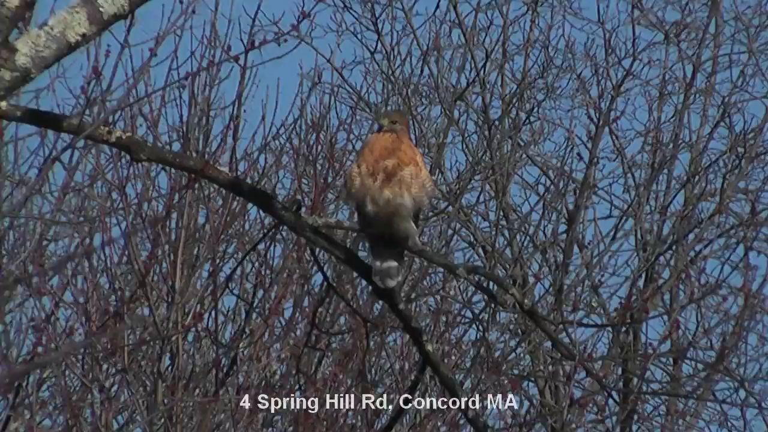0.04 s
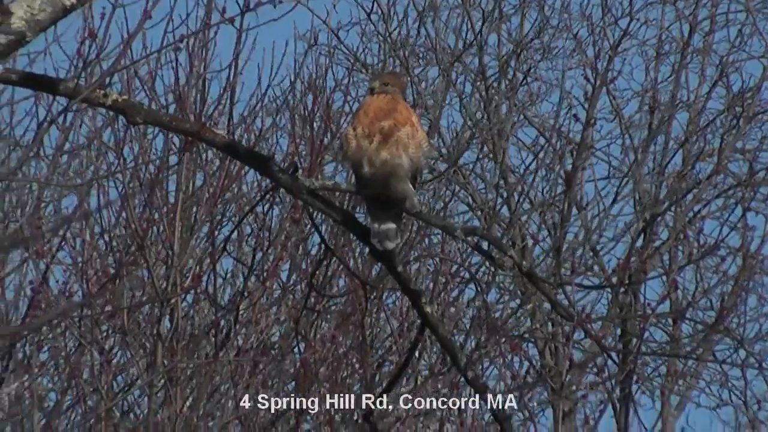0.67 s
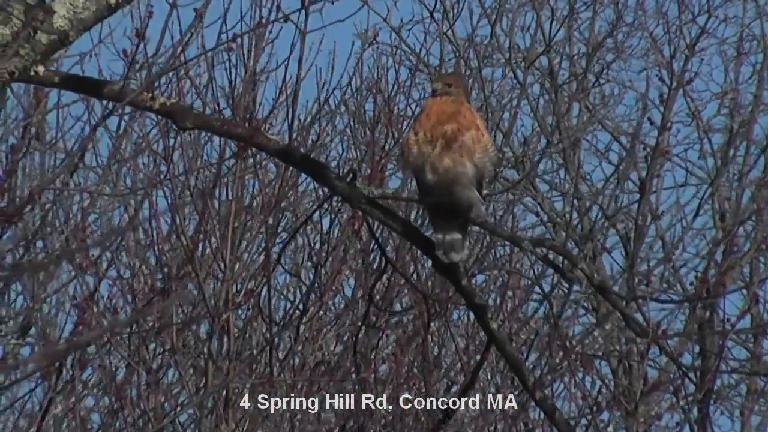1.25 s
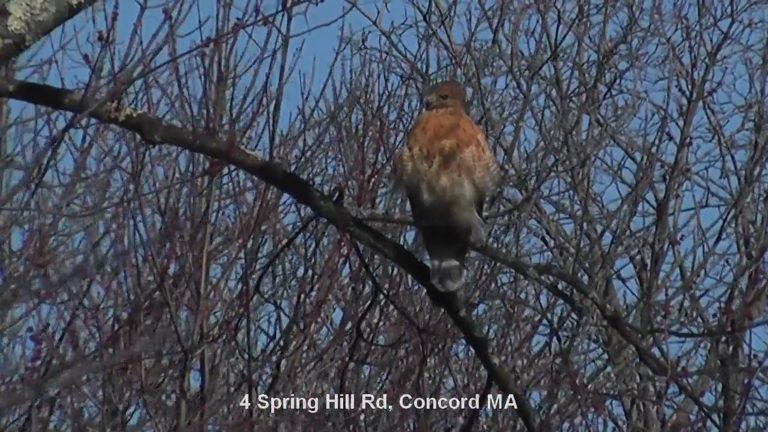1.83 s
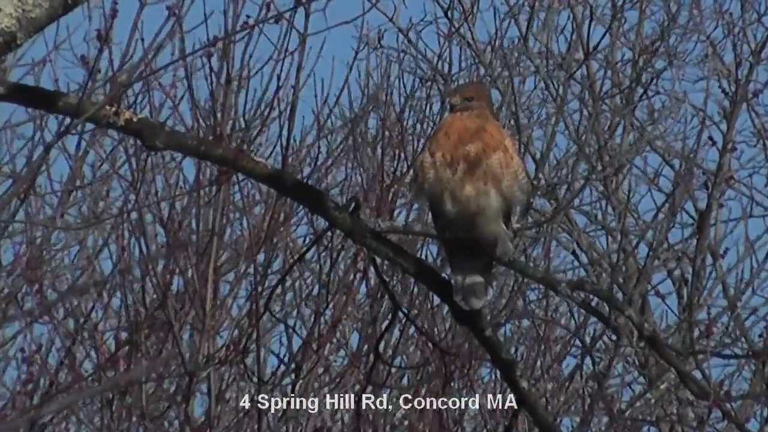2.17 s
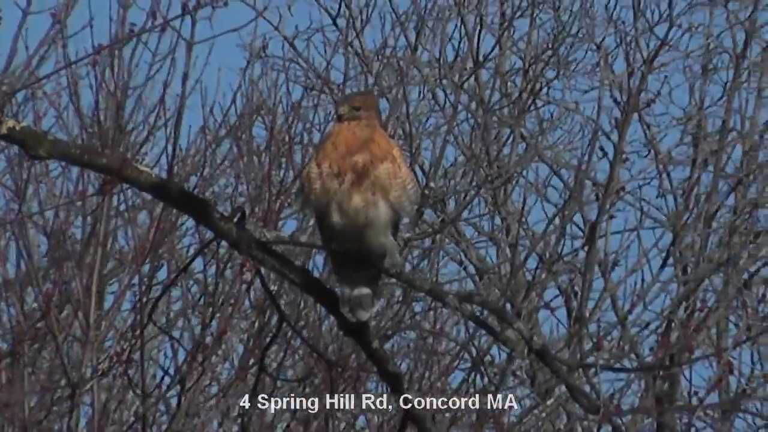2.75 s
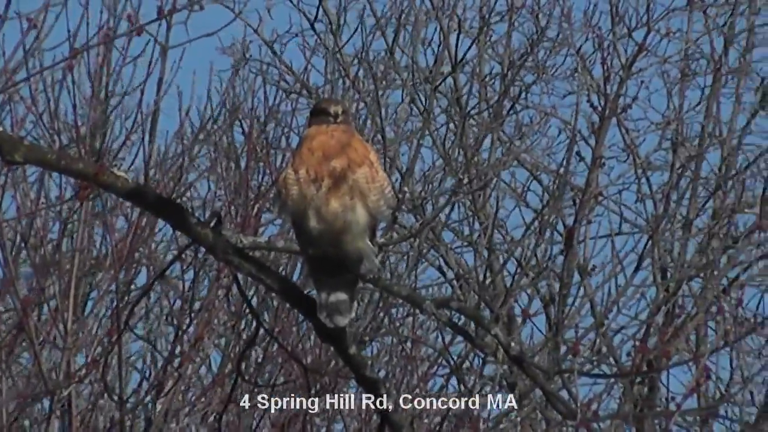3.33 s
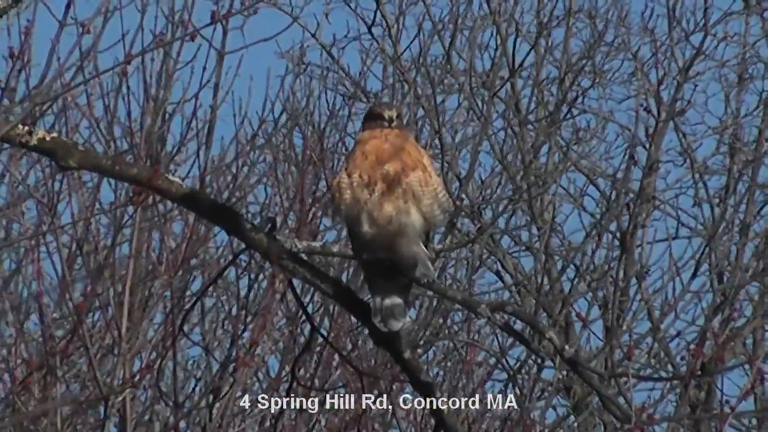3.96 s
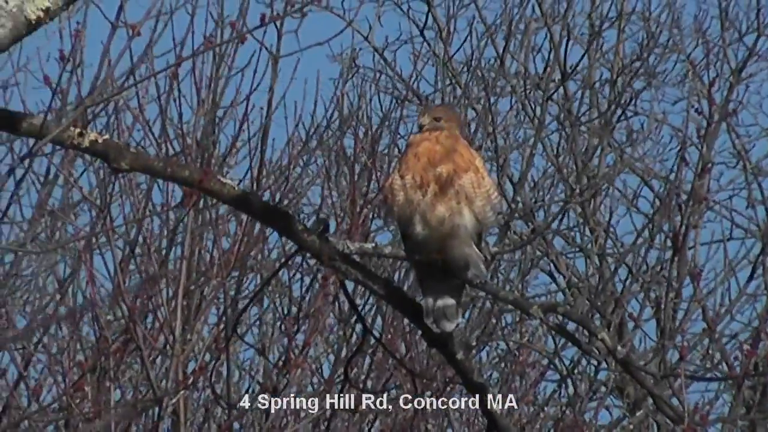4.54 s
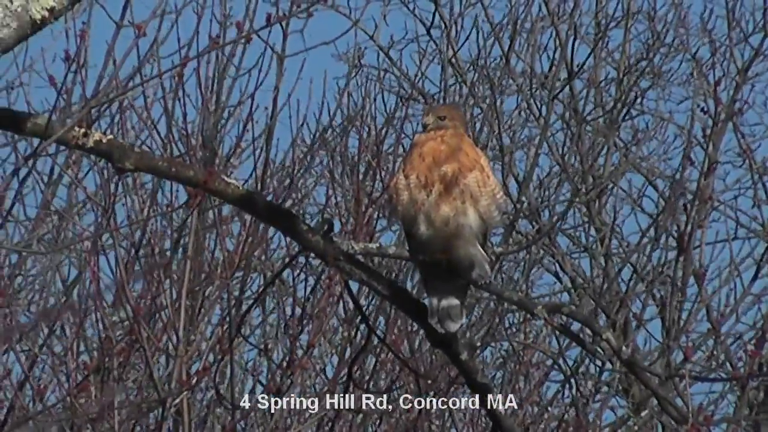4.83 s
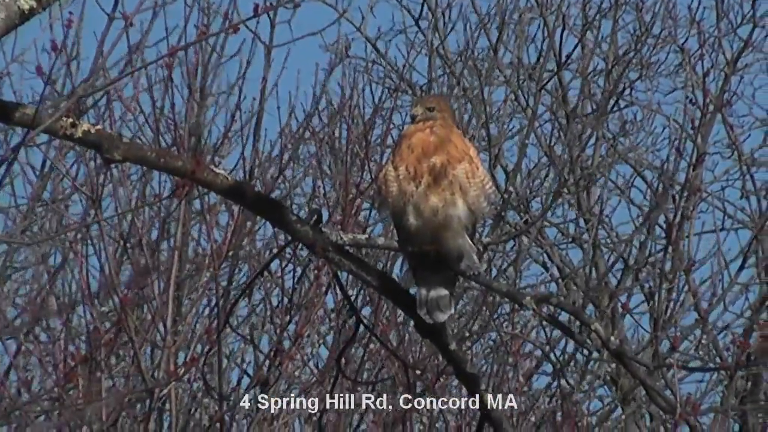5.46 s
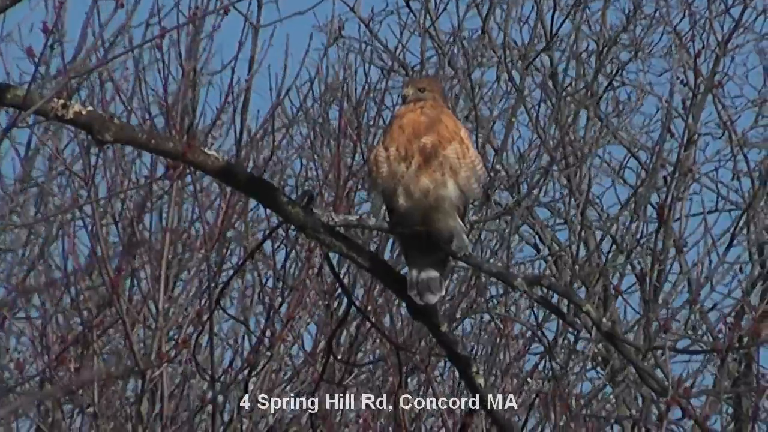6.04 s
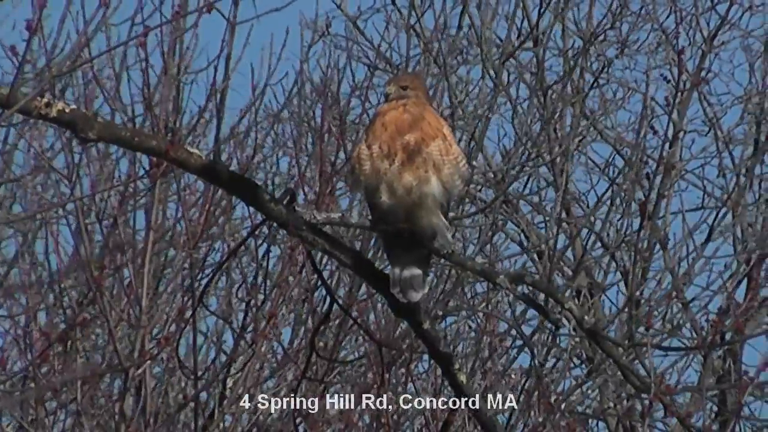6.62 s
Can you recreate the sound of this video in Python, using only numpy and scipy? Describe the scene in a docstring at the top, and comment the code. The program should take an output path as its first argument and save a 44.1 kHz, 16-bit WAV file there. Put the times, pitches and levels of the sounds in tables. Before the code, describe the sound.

Many small birds chirp and chatter close by and farther off, over a faint hum of distant traffic.

```python
"""Small birds in bare trees

A flock chatters around the microphone on a still day, with traffic humming in the distance.
Each call is one gliding whistle: a falling slur, a rising flick, an up-and-down chip, a bowed note,
a level peep, a buzz or a rasp. Trunks and twigs scatter it into a short blur, and the birds
farther off merge into a twitter. The sound starts a tenth of a second in."""
import sys
import numpy as np
from scipy import signal
from scipy.fft import rfft, irfft
from scipy.io import wavfile
from scipy.ndimage import uniform_filter1d

SR = 44100
rng = np.random.default_rng(int(sys.argv[2]) if len(sys.argv) > 2 else 0)


def dump(signal):
    """Clip the signal to [-1, 1] and save it as 16-bit WAV at the path in sys.argv[1]."""
    limited = np.clip(np.atleast_2d(signal).T, -1, 1)
    pcm = np.round(limited * 32767).astype(np.int16)
    wavfile.write(sys.argv[1], SR, pcm)


N = 295029
CUTOFF_HZ = 15600   # top of the recorder's range


def from_db(db):
    """Decibels as a gain."""
    return 10 ** (np.asarray(db) / 20)


def at_hz(points, hz):
    """Read a table on a log-frequency axis."""
    return np.interp(np.log(hz), np.log(np.array(points)[:, 0]), np.array(points)[:, 1])


def gain_curve(levels):
    """Levels over time as a gain for every sample."""
    return from_db(np.interp(np.arange(N) / SR, *np.transpose(levels)))


def drift(per_s, size):
    """A random wander of spread about 1, with per_s new values a second."""
    steps = np.arange(size) * per_s / SR
    count = int(steps[-1]) + 2
    return np.interp(steps, np.arange(count), rng.standard_normal(count))


def add(track, time, sound, pan_db):
    """Mix a sound into a stereo track, louder on the left by pan_db."""
    at = int(np.clip(time * SR, 0, N - 1))
    track[:, at:at + len(sound)] += from_db([[pan_db / 2], [-pan_db / 2]]) * sound[:N - at]


def stereo(mid, side, correlation):
    """Two unrelated signals make a left and right pair of the given correlation."""
    difference = np.sqrt((1 - correlation) / 2) * side
    return np.sqrt((1 + correlation) / 2) * mid + np.array([difference, -difference])


# Distant roads and still air at the microphone: (frequency [Hz], relative level [dB])
TRAFFIC_SPECTRUM = [(20, -26), (45, -11.5), (70, -10), (120, -1.5), (190, 0.5), (250, -2), (350, -2),
                    (430, -5.5), (800, -10), (2000, -14), (4000, -18), (7500, -34), (11000, -37),
                    (13000, -35.5), (14700, -46), (15500, -47)]
# How alike the two channels are: (frequency [Hz], correlation [-1 to 1])
TRAFFIC_CORRELATION = [(25, -0.5), (45, -0.61), (75, 0.9), (150, 0.85), (350, 0.79), (700, 0.48),
                       (1100, 0.6), (1900, 0.59), (3300, 0.46), (5500, 1), (9000, 1), (11000, 0.28),
                       (13000, -0.11)]
# The side the roar leans to: (frequency [Hz], left minus right [dB])
TRAFFIC_PAN = [(25, 0), (60, 3.5), (110, 0.5), (250, .5), (700, 0), (1300, -2), (2400, -0.5), (8000, -2),
               (15000, 2)]


def traffic(level_db=-43.5, swell_db=0.76):
    """Far roads give a smooth low roar that thins into hiss."""
    hz = np.maximum(np.arange(N // 2 + 1) * SR / N, 1)
    mid, side = rfft(rng.standard_normal((2, N)))
    colour = from_db(at_hz(TRAFFIC_SPECTRUM, hz) + at_hz(TRAFFIC_PAN, hz) * np.array([[.5], [-.5]]))
    roar = irfft(stereo(mid, side, at_hz(TRAFFIC_CORRELATION, hz)) * colour, N)
    roar /= np.sqrt(np.mean(roar ** 2))
    return roar * from_db(level_db - swell_db * drift(3.06, N))


def trees(sound, decay_s, gap_s, dull_hz, correlation=0.98, reflections=260):
    """Trunks and twigs return many weak reflections, dull at the top and 60 dB down after decay_s."""
    paths = np.zeros((2, SR))
    for path in paths:
        delays = ((gap_s + .7 * rng.random(reflections) ** 1.5) * SR).astype(int)
        path[delays] = rng.standard_normal(reflections) * from_db(-60 * delays / SR / decay_s)
        path /= np.sqrt(np.sum(path ** 2))
    dulled = signal.sosfilt(signal.butter(2, dull_hz, fs=SR, output="sos"), sound)
    return signal.fftconvolve(dulled, stereo(*paths, correlation), axes=1)[:, :N]


def progress(length):
    """A ramp from 0 to 1 over a note."""
    return np.linspace(0, 1, int(length * SR))


def glide(length, start, middle, end):
    """Syrinx tension bends the pitch along one arc through three points."""
    return np.polyval(np.polyfit([0, .5, 1], [start, middle, end], 2), progress(length))


# The octave comes through best from the higher notes: (note pitch [Hz], relative octave level [dB])
OCTAVE_LEVELS = [(3500, -33), (4700, -27), (5400, -16), (6200, -25), (7500, -28)]


def whistle(hz, shake=0.012, shake_per_s=700, flutter_db=2.0, attack=0.099, release=0.14, octave_db=0.0):
    """An unsteady tone with two faint overtones; attack and release are shares of its length."""
    size = len(hz)
    along = np.linspace(0, 1, size)
    unsteady_hz = hz * (1 + shake * drift(shake_per_s, size) + 0.0058 * drift(70, size))
    phase = 2 * np.pi * np.cumsum(unsteady_hz) / SR
    swell = np.sin(np.pi / 2 * np.clip(np.minimum(along / attack, (1 - along) / release), 0, 1))
    flutter = from_db(flutter_db * drift(300, size))
    octave = from_db(at_hz(OCTAVE_LEVELS, hz) + octave_db) * (2 * hz < CUTOFF_HZ) * np.sin(2 * phase)
    third_harmonic = from_db(-32) * (hz > 4400) * (3 * hz < CUTOFF_HZ) * np.sin(3 * phase)
    return np.sqrt(2) * swell * flutter * (np.sin(phase) + octave + third_harmonic)


def chorus(colour, count, low_hz, high_hz, longest_s, fall, direct_db, spread_db):
    """Random chirps, mostly falling, blur together through much wood; the level is held near 1."""
    calls = np.zeros((2, N))
    choices, quirks = rng.random((count, 3)), rng.standard_normal((count, 4))
    for (when, span, pitch), (slope, arch, strength, side) in zip(choices, quirks):
        centre_hz = low_hz * (high_hz / low_hz) ** pitch
        tilt = fall + 0.1107 * slope
        hz = glide(longest_s * (.2 + .8 * span), *centre_hz * np.exp([tilt, .08 * arch, -tilt]))
        hz = np.clip(hz, 1500, .4 * SR)
        gain = from_db(spread_db * strength + at_hz(colour, hz))
        add(calls, when * N / SR, gain * whistle(hz, shake=.014, octave_db=-1.0), pan_db=0.8 - side)
    heard = from_db(direct_db) * calls + trees(calls, decay_s=0.62, gap_s=.004, dull_hz=13900)
    running_power = uniform_filter1d(np.mean(heard ** 2, axis=0), int(.12 * SR))
    return heard / np.sqrt(running_power + 1e-6)


# The far flock and its thin high twitter at the microphone: (time [s], level [dB])
FLOCK_LEVELS = [(.1, -42.5), (.32, -50), (.5, -44.5), (.87, -50.5), (1.15, -47), (1.56, -49), (1.8, -53),
                (2.1, -54), (2.4, -50), (2.93, -48), (3.31, -45.5), (3.72, -49.5), (3.95, -54.5),
                (4.23, -51), (4.75, -46), (5.1, -46.5), (5.48, -52), (5.72, -44.5), (5.98, -50.5),
                (6.45, -47.5), (6.58, -51.5), (6.69, -42)]
TWITTER_LEVELS = [(.1, -66.5), (.55, -58), (.77, -70), (.87, -59.5), (1.6, -58), (1.78, -77), (2.03, -67),
                  (2.7, -64.5), (3.0, -62.5), (3.9, -64.5), (4.45, -61.5), (4.6, -66), (4.75, -63),
                  (5.27, -60.5), (5.45, -60), (5.77, -55.5), (5.98, -71), (6.2, -55), (6.45, -60),
                  (6.65, -56.5)]
# How strongly each pitch comes through in the two: (pitch [Hz], relative level [dB])
FLOCK_PITCHES = [(1900, -30), (2250, -1.5), (2700, -1.5), (3000, 1), (3600, 2.5), (4500, -0.5), (5600, -6),
                 (6500, -10), (7500, -7)]
TWITTER_PITCHES = [(5000, 12), (6500, 8), (8000, -2.5), (11000, -5), (13000, -6), (15000, -10)]


def far_flock():
    """Well back among the trees, a wash of lingering chirps with tiny high notes above it."""
    chirps = chorus(FLOCK_PITCHES, count=640, low_hz=2500, high_hz=6043, longest_s=.06,
                    fall=0.0489, direct_db=-2.0, spread_db=2.0)
    twitter = chorus(TWITTER_PITCHES, count=700, low_hz=5964, high_hz=13330, longest_s=.025,
                     fall=0.029, direct_db=-5.0, spread_db=-0.5)
    return gain_curve(FLOCK_LEVELS) * chirps + gain_curve(TWITTER_LEVELS) * twitter


# Distant birds, dead centre: (time [s], length [s], start [Hz], end [Hz], level before the wood [dB])
FAR_CALLS = [(.543, 0.067, 2360, 2170, -53), (.65, 0.067, 2250, 2170, -53.5), (.735, .07, 2360, 2110, -55),
             (1.22, .08, 2300, 2210, -58), (1.83, 0.047, 2300, 2150, -59), (1.915, 0.089, 2170, 2280, -55),
             (2.36, .05, 2270, 2180, -58), (2.72, 0.089, 2320, 2020, -54), (2.76, .12, 2860, 2700, -52),
             (2.88, 0.064, 2130, 2230, -58), (3.05, 0.096, 2230, 2320, -51.5), (3.68, .1, 2730, 2670, -51),
             (3.72, 0.13, 1800, 1750, -56.5), (4.7, .06, 2300, 2120, -53.5), (5.03, 0.053, 2380, 2270, -56),
             (5.27, 0.06, 2350, 2200, -56), (5.45, .07, 1925, 1860, -60), (5.68, 0.062, 2500, 2035, -53),
             (5.91, 0.057, 2190, 2320, -53)]


def far_whistles(direct_db=-2.0, echo_db=-3.0):
    """Low, slow whistles from deep in the wood, half drowned in their own echo."""
    calls = np.zeros((2, N))
    for time, length, start_hz, end_hz, level_db in FAR_CALLS:
        hz = glide(length, start_hz, (start_hz + end_hz) / 2, end_hz)
        add(calls, time, from_db(level_db) * whistle(hz, attack=0.14, release=0.21), pan_db=0)
    echo = trees(calls, decay_s=.6, gap_s=.006, dull_hz=6000, correlation=0.89)
    return from_db(direct_db) * calls + from_db(echo_db) * echo


# Harsh calls in front of the microphone: (time [s], length [s], nominal pitch [Hz], level [dB])
RASP_CALLS = [(0.55, 0.068, 6040, -58), (1.026, 0.047, 5770, -59), (1.583, .069, 5760, -54.5),
              (1.998, 0.025, 5700, -53.5), (3.364, 0.058, 5700, -55), (4.388, .065, 5950, -50.5),
              (4.653, 0.13, 6050, -55), (4.976, 0.061, 10300, -58), (5.023, .069, 8300, -58.5),
              (5.025, .05, 12400, -64), (5.085, .035, 12000, -67), (5.03, 0.14, 6270, -62),
              (5.35, .06, 7220, -55.5), (5.407, 0.12, 7060, -58), (5.733, 0.048, 5550, -49.5),
              (6.15, 0.075, 6400, -53.5), (6.214, 0.053, 8850, -69), (6.28, 0.11, 6280, -60),
              (6.612, 0.07, 5350, -56)]


def squabbles(fall=0.051, echo_db=-1.5):
    """A hard-driven syrinx shakes so fast that the whistle breaks into a rasp."""
    calls = np.zeros((2, N))
    for time, length, pitch_hz, level_db in RASP_CALLS:
        hz = pitch_hz * glide(length, 1 + fall, 0.96, 1 - fall)
        rasp = whistle(hz, shake=0.086, shake_per_s=850, flutter_db=0.0, attack=0.19, octave_db=3.5)
        add(calls, time, from_db(level_db) * rasp, pan_db=0.5)
    return calls + from_db(echo_db) * trees(calls, decay_s=0.16, gap_s=0.0016, dull_hz=13000)


def call(time, hz, level_db, pan_db, echo_db, echo_follows=0.77, octave_db=0.0):
    """One call: its time, its pan, the whistle reaching the microphone and that sent into the wood."""
    tone = whistle(hz, octave_db=octave_db)
    typical_db = -49
    # The echo varies less than the direct sound between near calls and faint, far ones.
    wood_db = typical_db + echo_db + echo_follows * (level_db - typical_db)
    return time, pan_db, from_db(level_db) * tone, from_db(wood_db) * tone


# Nearly level notes from straight ahead: (time [s], length [s], nominal pitch [Hz], level [dB])
PEEP_CALLS = [(1.017, .02, 7750, -56), (1.204, 0.051, 5980, -52.5), (1.282, 0.033, 5220, -50.5),
              (1.781, 0.025, 6140, -59), (2.535, .035, 5900, -58.5), (2.859, 0.033, 9850, -64),
              (3.005, 0.026, 3650, -50), (3.53, .04, 9100, -68), (3.727, 0.067, 5370, -54.5),
              (3.74, 0.05, 3550, -51), (3.888, 0.021, 3450, -47), (3.895, .035, 5350, -58),
              (3.969, 0.046, 5480, -50.5), (4.219, 0.037, 3410, -48.5), (4.456, 0.042, 4830, -50),
              (4.495, .02, 6180, -52), (4.927, 0.029, 3690, -45), (5.245, 0.023, 5020, -48),
              (5.425, 0.037, 9700, -61), (5.812, 0.029, 5900, -59), (5.898, 0.073, 9430, -63),
              (6.272, 0.021, 3050, -54), (6.557, 0.032, 3080, -48)]


def peeps():
    """Held notes that lift a little and sag at the end."""
    for time, length, pitch_hz, level_db in PEEP_CALLS:
        hz = pitch_hz * glide(length, 0.9685, 0.99, 0.937)
        yield call(time, hz, level_db, pan_db=0, echo_db=-5.5, echo_follows=0.94)


# Bowed notes from the nearby trees:
# (time [s], length [s], start [Hz], middle [Hz], end [Hz], level [dB], left minus right [dB])
ARC_CALLS = [(.847, 0.023, 5530, 7000, 7640, -48, -0.5), (1.176, 0.029, 5260, 5840, 5630, -47, 0),
             (2.016, 0.026, 3990, 4450, 3700, -42, 1), (2.3, 0.08, 3220, 3540, 3250, -49, 2),
             (2.852, .048, 4500, 4950, 4700, -62, -2), (2.938, 0.035, 4100, 4200, 3750, -55, 0),
             (3.285, 0.016, 5450, 5870, 5700, -56, 0), (4.454, 0.041, 9000, 9620, 8900, -57, -2),
             (4.548, 0.026, 6400, 7640, 8400, -54, 1), (4.73, 0.036, 5160, 6300, 5960, -48.5, -2),
             (4.796, .045, 4960, 6550, 6200, -57, -2), (4.837, 0.059, 6250, 5790, 5950, -42, 1),
             (4.913, 0.041, 7000, 7500, 6700, -57, -1), (5.189, 0.029, 3820, 4580, 4400, -43, 6),
             (5.22, .045, 3386, 3474, 2560, -42.5, -6), (5.507, 0.066, 3440, 3656, 3140, -43, -6),
             (6.168, 0.046, 3480, 3414, 2620, -46.5, -1), (6.222, 0.044, 4860, 4670, 4000, -47, 1),
             (6.238, .038, 9200, 9050, 7950, -61, 0), (6.343, .03, 7100, 8250, 7600, -61, 0),
             (6.352, .098, 3800, 3710, 2960, -44.5, 2.5), (6.416, 0.04, 4980, 4430, 4330, -40.5, 2)]


def arcs():
    """Whistles whose pitch bows upward or downward on its way."""
    for time, length, start_hz, middle_hz, end_hz, level_db, pan_db in ARC_CALLS:
        yield call(time, glide(length, start_hz, middle_hz, end_hz), level_db, pan_db, echo_db=-3.5)


# Rising notes close by: (time [s], length [s], nominal pitch [Hz], level [dB], left minus right [dB])
FLICK_CALLS = [(0.16, 0.012, 3530, -51, 8), (0.212, 0.022, 4100, -48, -6), (0.272, 0.026, 3240, -44.5, -6),
               (0.406, 0.03, 3360, -44.5, 0), (0.681, 0.02, 4800, -48.5, 6), (0.827, 0.03, 4490, -46, 1),
               (1.114, 0.02, 3760, -44.5, 8), (1.366, 0.016, 3920, -40, 7), (2.143, 0.014, 5150, -49.5, 0),
               (2.672, .012, 3660, -47, 3), (3.092, 0.017, 5400, -46, 5), (3.197, 0.016, 3420, -41.5, 7),
               (3.412, .014, 4300, -43, 5), (3.436, 0.018, 4010, -40.5, 6),
               (3.872, 0.0095, 3530, -43.5, -6), (4.447, 0.013, 3590, -40, 5),
               (4.806, 0.033, 3480, -40.5, 2), (5.055, 0.015, 3920, -44, 4), (5.156, 0.036, 3380, -46, 2),
               (5.36, 0.03, 4310, -48.5, 1), (5.487, 0.022, 3220, -45, 0), (5.523, 0.018, 8130, -55, 1),
               (5.618, 0.012, 5900, -52, 5), (5.761, 0.02, 4700, -41, 3), (5.788, 0.014, 3940, -43, 8),
               (6.215, 0.017, 9150, -54, 1), (6.311, 0.029, 4350, -50, 1), (6.377, 0.017, 4300, -46, 2),
               (6.611, 0.035, 5300, -45, 4)]


def flicks():
    """Quick upward strokes of pitch."""
    for time, length, pitch_hz, level_db, pan_db in FLICK_CALLS:
        hz = pitch_hz * glide(length, 0.8224, 0.98, 1.12)
        yield call(time, hz, level_db, pan_db, echo_db=-4.5)


# Sharp chips close by, mostly on the left: (time [s], rise [s], fall [s], top [Hz],
# bend [1 pointed to 3 flat-topped], level [dB], left minus right [dB])
CHIP_CALLS = [(0.568, 0.022, 0.033, 6080, 2.6, -46.5, 6), (0.347, 0.024, 0.018, 4620, 1.1, -52, 1),
              (1.03, 0.013, 0.034, 5870, 2.05, -43.5, 4.5), (1.341, 0.015, 0.012, 4840, 1.03, -44, 5),
              (2.33, 0.016, 0.032, 5970, 2.7, -49, -1.5), (2.387, 0.016, 0.034, 5730, 1.6, -47, 0.5),
              (2.708, .022, 0.015, 5500, 2.2, -49, 0), (3.111, 0.016, 0.032, 5820, 2.8, -45.5, 6),
              (4.294, 0.017, 0.031, 4640, 1.9, -54, -12), (4.367, 0.017, 0.018, 4980, 1.2, -40, 5),
              (4.758, 0.017, 0.015, 5490, 1.36, -39, 1), (5.072, 0.012, 0.046, 6160, 3.1, -41.5, 4),
              (6.467, 0.021, 0.022, 4580, 1.2, -48.5, 5), (6.642, 0.011, 0.026, 5720, 2.6, -46, 7)]


def chips(rise_share=.41, fall_share=.36):
    """The pitch shoots up, turns at a pointed or rounded top and drops again."""
    for time, rise, fall, top_hz, bend, level_db, pan_db in CHIP_CALLS:
        rising = 1 - rise_share * progress(rise)[::-1] ** bend
        falling = 1 - fall_share * progress(fall) ** bend
        yield call(time, top_hz * np.r_[rising, falling], level_db, pan_db, echo_db=-2.5, octave_db=-2.5)


# Falling notes on both sides of the microphone:
# (time [s], length [s], start [Hz], end [Hz], level [dB], left minus right [dB])
SLUR_CALLS = [(.101, 0.038, 4460, 3790, -51, 9), (.102, 0.084, 3820, 2527, -42, 3.5),
              (0.143, 0.033, 6000, 4300, -61, 3), (0.235, 0.011, 4470, 3170, -46.5, -8),
              (0.427, 0.052, 4380, 3520, -50, 0), (0.441, 0.025, 3750, 2770, -49, -1),
              (0.823, 0.023, 4400, 3310, -49, -8), (0.862, 0.05, 3420, 2740, -48, -6),
              (0.935, 0.026, 2910, 2550, -50, 0), (1.529, 0.025, 4600, 3670, -46.5, -1),
              (2.049, 0.042, 3750, 2760, -44, -1), (2.12, 0.045, 3010, 2480, -52, -9),
              (2.148, 0.065, 9400, 8860, -60, 0), (2.654, .037, 5200, 4070, -53.5, 4),
              (2.903, 0.037, 4140, 3450, -50.5, -4), (2.975, 0.035, 5900, 5200, -56, 0),
              (3.003, .02, 5320, 4400, -46, 2), (3.36, .02, 4630, 3670, -52, -1),
              (3.518, 0.065, 3706, 3250, -48, -8), (3.602, 0.046, 5600, 3850, -52, 0),
              (3.686, 0.038, 3630, 2524, -48.5, -2), (3.779, 0.022, 5600, 4500, -51, 2),
              (3.812, 0.044, 5320, 3850, -48.5, -6), (4.014, 0.076, 5200, 3210, -41, 0),
              (4.153, 0.07, 3480, 2390, -50, 1), (4.32, 0.047, 5790, 4820, -49.5, 1),
              (4.323, 0.024, 4300, 3110, -44.5, -6), (4.451, 0.09, 3890, 2497, -40, -1.5),
              (4.728, 0.047, 3900, 3160, -41.5, 7), (4.966, 0.09, 3300, 2250, -50.5, 1),
              (5.015, 0.024, 5060, 3830, -48, 1), (5.395, 0.026, 6070, 5100, -47, 0),
              (5.453, 0.029, 4450, 3240, -45, 1), (5.555, 0.021, 4430, 3820, -39, 1.5),
              (5.92, 0.039, 3300, 2570, -48.5, 2), (6.1, 0.055, 5130, 3450, -47, 1),
              (6.13, 0.036, 6370, 5220, -54, 0), (6.526, 0.07, 5360, 3970, -48, -2),
              (6.575, 0.045, 4080, 2960, -42.5, 2.5), (6.601, 0.048, 5580, 4720, -47, 1)]


def slurs(arch=0.0199):
    """Clean whistles that slide down, arching just above a straight glide."""
    for time, length, start_hz, end_hz, level_db, pan_db in SLUR_CALLS:
        hz = glide(length, start_hz, (1 + arch) * (start_hz + end_hz) / 2, end_hz)
        yield call(time, hz, level_db, pan_db, echo_db=-3.5)


# One bird close on the left keeps buzzing: (time [s], length [s], middle pitch [Hz], level [dB])
BUZZ_CALLS = [(0.425, 0.04, 3680, -46.5), (0.612, 0.04, 3500, -40), (1.133, 0.03, 3450, -45.5),
              (1.394, 0.0286, 3570, -36), (1.422, 0.035, 3250, -43.5), (1.595, 0.04, 3950, -47),
              (1.618, 0.076, 3560, -43), (2.694, 0.051, 3700, -42.5), (3.165, 0.035, 4100, -47),
              (3.217, 0.037, 3560, -46), (3.378, 0.048, 4860, -51), (3.421, 0.039, 4250, -43.5),
              (3.461, 0.035, 3424, -40), (3.52, 0.041, 3920, -55), (3.543, 0.0355, 2940, -51),
              (4.682, 0.034, 4130, -42), (5.632, 0.03, 4250, -43), (5.661, 0.044, 3550, -39.5),
              (5.742, 0.042, 4200, -44.5), (5.813, 0.029, 3585, -39.5), (5.83, .032, 2986, -43)]


def buzzes(fall_per_s=4.47, trill_per_s=105, depth_hz=167):
    """The pitch sinks at a steady rate while a quick, uneven trill shakes it."""
    for time, length, middle_hz, level_db in BUZZ_CALLS:
        hz = middle_hz * np.exp(-fall_per_s * length * (progress(length) - .5))
        turns = np.cumsum(trill_per_s * (1 + 0.31 * drift(64.6, len(hz)))) / SR
        trill = np.sin(2 * np.pi * (turns + rng.random()))
        yield call(time, hz + depth_hz * trill, level_db, pan_db=5.5, echo_db=-3.8)


def near_birds(twigs_db=-7.0, echo_pan_share=0.49):
    """The closest chirps reach the microphone directly, off nearby twigs and off the wood beyond."""
    direct, scattered = np.zeros((2, 2, N))
    for time, pan_db, to_mic, to_wood in [*slurs(), *chips(), *flicks(), *buzzes(), *arcs(), *peeps()]:
        add(direct, time, to_mic, pan_db)
        add(scattered, time, to_wood, echo_pan_share * pan_db)
    twigs = from_db(twigs_db) * trees(direct, decay_s=0.083, gap_s=.002, dull_hz=12700)
    wood = trees(scattered, decay_s=.7, gap_s=.01, dull_hz=9500)
    return direct + twigs + wood


def scene():
    """From one spot among the trees, near and far birds call over the traffic."""
    return traffic() + near_birds() + squabbles() + far_whistles() + far_flock()


def record(dry, start_s=.1, fade_s=.006, notch_hz=2540, notch_share=0.54):
    """The sound opens quickly; the recorder has one shallow notch and cuts the top."""
    opened = dry * np.clip((np.arange(N) / SR - start_s) / fade_s, 0, 1)
    full_notch = signal.lfilter(*signal.iirnotch(notch_hz, Q=16, fs=SR), opened)
    notched = opened + notch_share * (full_notch - opened)
    return signal.sosfilt(signal.ellip(10, .1, 80, CUTOFF_HZ, fs=SR, output="sos"), notched)


dry = scene()
out = record(dry)
dump(out)
```